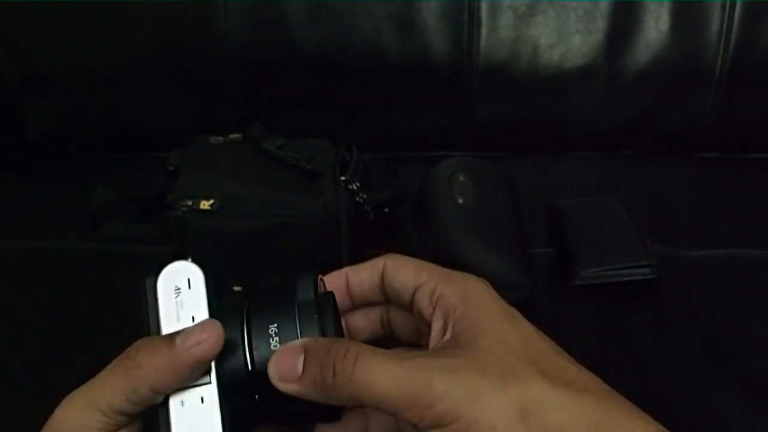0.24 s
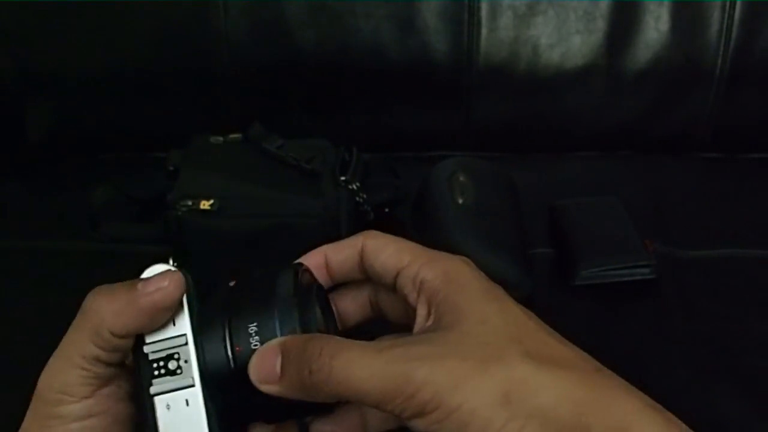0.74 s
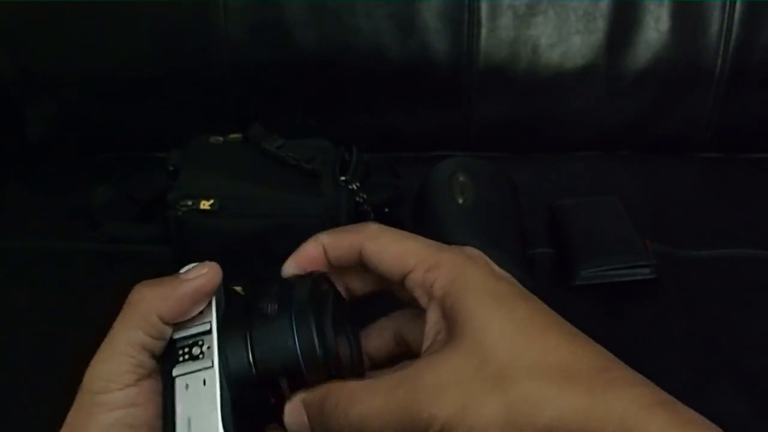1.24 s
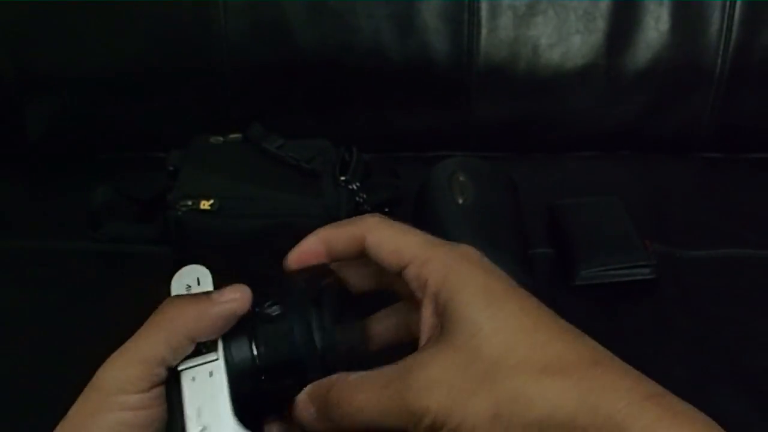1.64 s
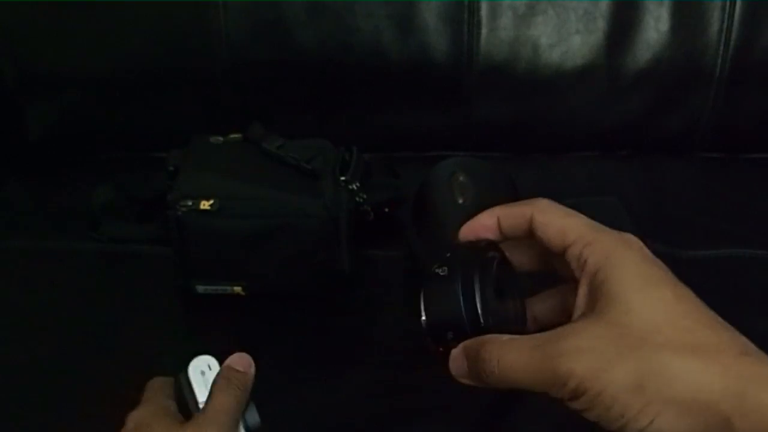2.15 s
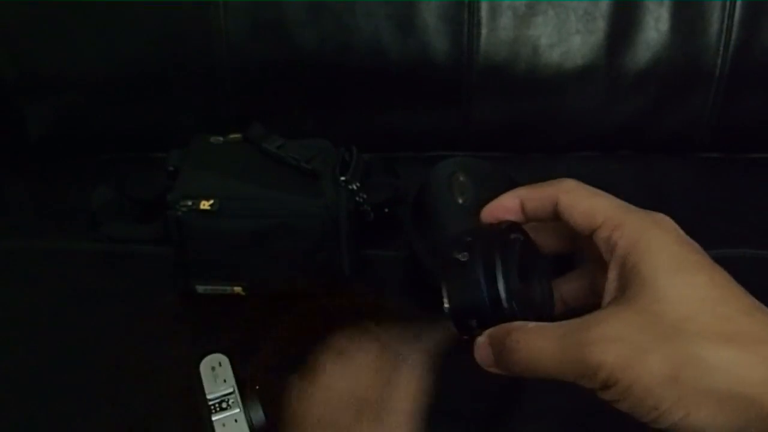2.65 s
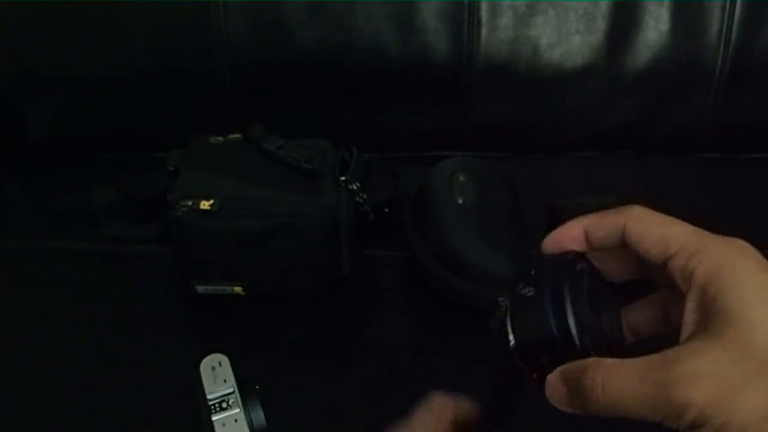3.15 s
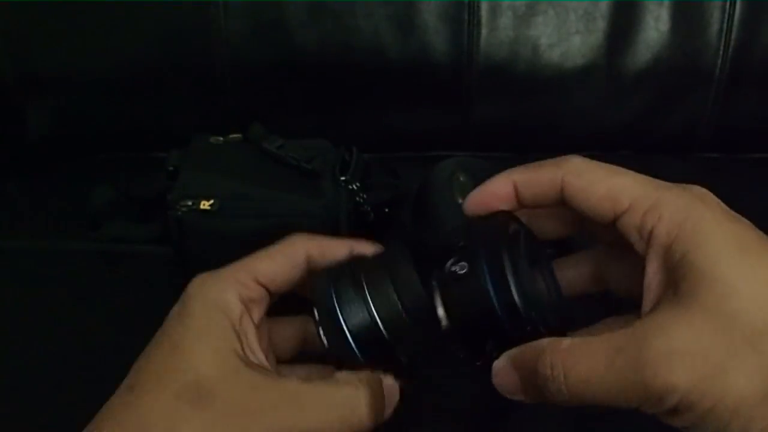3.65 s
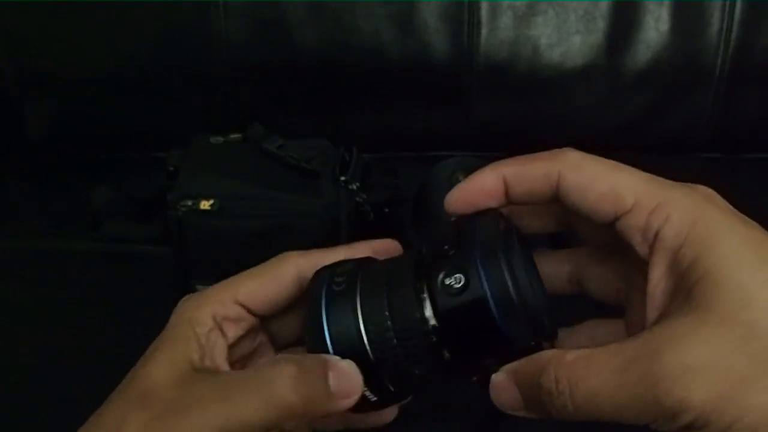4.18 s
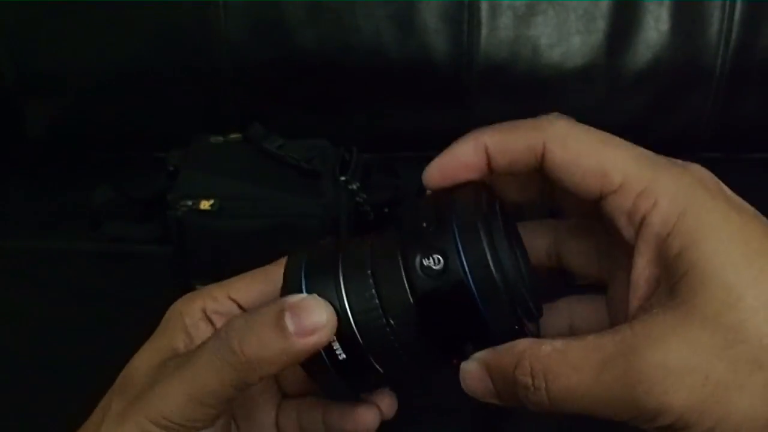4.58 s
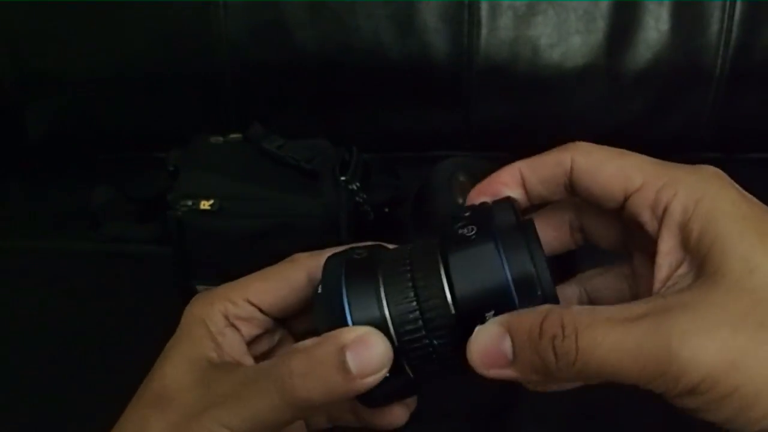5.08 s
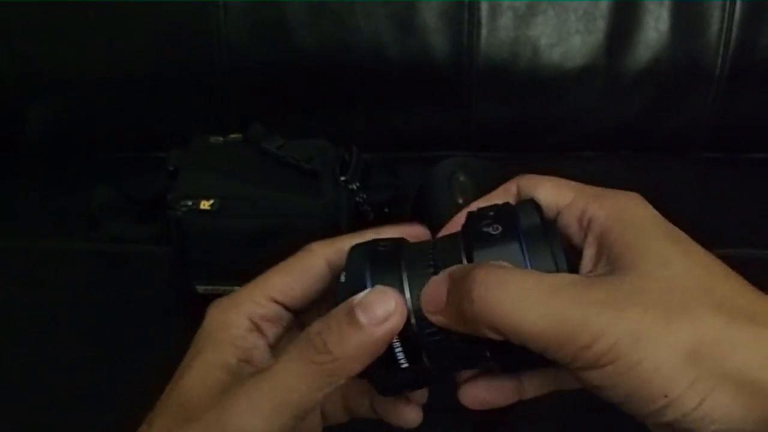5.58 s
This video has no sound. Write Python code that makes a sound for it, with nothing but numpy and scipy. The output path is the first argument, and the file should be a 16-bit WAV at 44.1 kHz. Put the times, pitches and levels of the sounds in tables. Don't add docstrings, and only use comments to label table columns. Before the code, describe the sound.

Two hands handle camera parts just right of centre, heard very near. High tiny ticks and a faint rubber squeak lead to detent clicks, then a cluster of clacks as the lens detaches. Dull padded bumps follow. Another lens knocks in brightly, the pair are twisted and coupled with crisp metal blows, the hardest ringing briefly in the room. It ends on faint finger rubs and a soft double knock over steady low hush.

```python
import sys
import numpy as np
from scipy import signal
from scipy.fft import rfft, irfft, next_fast_len
from scipy.io import wavfile
from scipy.ndimage import uniform_filter1d, map_coordinates

SR = 44100
rng = np.random.default_rng(int(sys.argv[2]) if len(sys.argv) > 2 else 0)


def store_pcm(level_fs):
    pcm = np.round(np.clip(level_fs, -1, 1) * 32767).astype(np.int16)
    wavfile.write(sys.argv[1], SR, np.atleast_2d(pcm).T)


def rack_gain(trim_db):
    fader = np.asarray(trim_db, float)
    return 10 ** (fader / 20)


N = 256662


# t/s, peak level/dB, barrel knock/dB, bright edge/dB, strongest mode f/Hz
COUPLING_BLOWS = [(3.9929, -12.5, 0.5, -12.5, 2940), (4.0031, -20, -7, -20, 2880),
                  (4.006, -25, -20, -22, 3300), (4.015, -29, -4, -8, 2000), (4.0234, -23.5, -5, -32, 1703),
                  (4.0445, -31, -1, -26, 1880), (4.087, -17, -7.5, -6.5, 2400),
                  (4.091, -32, -10, -16, 2300), (4.097, -25, 1, -22, 2400), (4.1035, -30, -10, -16, 2420),
                  (4.1095, -31, 5, -9, 1910), (4.116, -45, -4, -12, 3200), (4.1685, -16, -10, -11, 3870),
                  (4.1753, -29, 5, -20, 4350), (4.179, -33, -3, -22, 2120), (4.19, -33.5, 6, -8, 2090),
                  (4.4098, -21, -6.5, -11.5, 2030), (4.4134, -6, -4, -14.5, 4420),
                  (4.415, -10.5, -10, -9.5, 6440), (4.4172, -13.5, -1.5, -13, 4370),
                  (4.4244, -30, -4, -14, 2170), (4.4335, -43, 0, -18, 2050), (4.44, -25.5, -3, -22, 2050),
                  (4.4435, -25, -12, -22, 4550), (4.4525, -30, 4, -18, 2980),
                  (4.4573, -16, -7.5, -20, 4680), (4.4655, -18, -12, -13, 4440), (4.473, -36, 0, -20, 2050),
                  (4.478, -29, -2, -17, 4300)]


def coupling():
    return contacts(COUPLING_BLOWS, t60=0.015, low_hz=1420, sing=0.98)


# t/s, peak level/dB, barrel knock/dB, bright edge/dB, strongest mode f/Hz
CLACK_BLOWS = [(1.555, -19, -4, -15, 3380), (1.558, -18, -9, -14, 3300), (1.5625, -36, 0, -17, 2920),
               (1.5685, -38, 3, -17, 3100), (1.574, -29, 4, -22, 2100), (1.5835, -22.5, -1.5, -18, 3900),
               (1.588, -32, -5, -13, 2600), (1.5922, -22, -23, -12, 5100), (1.597, -26, -10, -25, 4570),
               (1.6005, -31, -10, -11, 3300), (1.6035, -30, -1, -21, 4370), (1.6075, -28.5, 1, -23, 2900),
               (1.6105, -40, -6, -17, 4600), (1.616, -40, -1, -19, 3000), (1.6504, -40, -10, -14, 1680),
               (1.6692, -37, -21, -21, 3940), (3.2497, -18.5, 0, -22, 2180),
               (3.2508, -11, -1.5, -8.5, 4330), (3.2535, -17, -6, -12, 3234), (3.2565, -21, 0, -24, 3130),
               (3.2625, -28, -2, -22, 3160), (3.268, -39, -8, -20, 2000), (3.288, -45, -11, -16, 3100),
               (3.2762, -25, -24, -16, 4240), (3.3322, -29, -2, -16, 1810), (3.3368, -25.5, 4, -28, 1500),
               (3.34, -29.5, -8, -20, 4200)]


def clacks():
    return contacts(CLACK_BLOWS, t60=0.012, low_hz=1383, sing=1.0)


# t/s, peak level/dB, barrel knock/dB, bright edge/dB, strongest mode f/Hz
DETENT_CLICKS = [(0.9041, -28.5, -10.5, 0.5, 3300), (0.9175, -27.5, -21, -9, 5460),
                 (1.1488, -28, -2, -24, 2950), (1.1554, -34, 2, -32, 3500), (1.1528, -33, -7, -27, 3560),
                 (1.1645, -35.5, -8, -18, 2900), (1.185, -44, 3, -30, 2050), (1.202, -32, -8.5, -11, 4540),
                 (1.2436, -35.5, -12, -19, 4200), (1.2521, -39, -13, -28, 2050),
                 (1.2565, -47, -10, -22, 3000), (1.2866, -46, -28, -28, 4050), (1.409, -42, -9, -11, 1740)]


def detents():
    return contacts(DETENT_CLICKS, t60=0.019, low_hz=2300, sing=1.26)


# t/s, peak level/dB, barrel knock/dB, bright edge/dB, strongest mode f/Hz
LATCH_CLICKS = [(0.2554, -39.5, -9, -24, 3720), (0.3065, -34.5, 11, 0.5, 2050),
                (0.3338, -35.5, -6, -10, 3750), (0.5708, -41, -15, -32, 2200),
                (0.5795, -38, -22, -19, 2100), (0.5963, -43, -14, -12, 2050), (0.621, -41, -5, -29, 2360),
                (0.633, -37, -9, -31, 2350), (0.6447, -32.5, -13, -27, 2370), (0.6608, -34, -22, -26, 3220),
                (0.6838, -35, -26, -23, 3200), (0.733, -28, -18, -36, 3370), (0.7563, -24, -18, -19, 3290),
                (0.7654, -31.5, -11, -25, 3100), (0.8039, -36, -22, -6, 3840)]


def latch():
    return contacts(LATCH_CLICKS, t60=0.014, low_hz=2200, sing=1.0)


# t/s, peak level/dB, barrel knock/dB, bright edge/dB, strongest mode f/Hz
STRAY_TICKS = [(1.8107, -40.5, -2, -15, 1630), (2.0247, -33, -1, -16, 2300), (2.0385, -32, -5, -28, 2453),
               (2.172, -41, 9, -20, 1560), (2.2131, -38, -1, -17, 1830), (2.994, -45, -20, -5, 4200),
               (3.015, -36, 1.5, -14, 3580), (4.6503, -43, -9, -17, 3500), (4.7212, -37.5, -6, -3, 2050),
               (5.1587, -38.5, -8, -18, 2130), (5.342, -40, -11, -33, 3980), (5.7393, -42, -8, -22, 1760),
               (5.7435, -42, -12, -20, 2016), (5.7552, -49, -15, -28, 4200),
               (5.7625, -39.5, -20, -14, 3370), (5.7665, -42, -12, -12, 2120), (5.7715, -47, -20, -8, 4300),
               (5.7787, -28, -5, -20, 1690), (5.7834, -30, -8, -20, 2240), (5.7907, -32, -21, -23, 1720),
               (5.802, -43, -10, -20, 4200), (5.8055, -47, -10, -18, 2050)]


def stray_ticks():
    return contacts(STRAY_TICKS, t60=0.022, low_hz=1460, sing=1.0)


# f/Hz, level/dB
BARREL_MODES = [(760, -16), (1015, 4.5), (1100, 0.5), (1210, -3), (2070, -4), (3150, -4.5), (4350, -15)]
# f/Hz, level/dB
MOUNT_STRENGTH = [(1500, -8), (2080, 0), (2600, -8), (3200, -7), (3700, -6), (4300, -1), (5600, -7)]
# f/Hz, width/Hz, level/dB
EDGE_PEAKS = [(7190, 1250, -1), (8500, 1100, 2), (9720, 1230, -2), (12520, 1570, -3.5), (13800, 1900, -5.5)]


def contacts(rows, t60, low_hz, sing):
    out, t = np.zeros((2, N + SR)), np.arange(SR // 22) / SR
    broad = signal.butter(2, [low_hz, 6500], "band", fs=SR, output="sos")
    dense_hz = np.geomspace(low_hz, 5800, num=40)
    dense = np.transpose([dense_hz, along(MOUNT_STRENGTH, dense_hz)])
    spit = rack_gain(-60 * t / (1.55 * t60)) + rack_gain(6 - 60 * t / 0.0032)
    rise = 1 - np.exp(-t / 0.00021)
    for s, db, knock_db, edge_db, hz in rows:
        knock = rack_gain(knock_db + 5.0) * ringing(BARREL_MODES, t, 1.53 * t60, detune=0.041, scatter=0.69)
        luck = rng.standard_normal(len(EDGE_PEAKS))
        facets = [(c, w, g + 2.14 * k) for (c, w, g), k in zip(EDGE_PEAKS, luck)]
        crack = filtered(spit * rng.standard_normal(len(t)), resonant(facets))
        voice = rack_gain(-3.5 - 60 * t / (sing * t60)) * np.sin(2 * np.pi * hz * t)
        snap = rack_gain(2.5 - 60 * t / 0.0044) * signal.sosfilt(broad, rng.standard_normal(len(t)))
        mount = ringing(dense, t, t60, detune=0.029, scatter=np.pi)
        rest = mount + snap + knock + rack_gain(edge_db + 5.5) * crack
        blow = rise * (rest + voice * rack_gain([[0], [-9]]))
        out[:, round(s * SR):][:, :len(t)] += rack_gain(db + 1.0) * blow / np.abs(blow[0]).max()
    return out[:, :N]


def ringing(modes, t, t60, detune, scatter):
    hz, db = np.transpose(modes)
    luck = rng.standard_normal((4, len(hz), 1))
    swing = np.sin(2 * np.pi * hz[:, None] * (1 + detune * luck[1]) * t + scatter * luck[3])
    decay = rack_gain(db[:, None] + 2.0 * luck[0] - 60 * t / t60 * rack_gain(0.5 * luck[2]))
    ring = (decay * swing).sum(0)
    return ring / np.abs(ring).max()


# t/s, level/dB, f/Hz, t60/s
LINGERING_MODES = [(0.918, -43, 5600, .07), (1.149, -50, 1094, 0.091), (1.556, -36, 1080, .25),
                   (1.585, -35, 1177, .25), (1.603, -40, 1020, 0.17), (3.251, -27.5, 1101, 0.14),
                   (3.25, -27, 1364, 0.082), (3.252, -36, 2070, .07), (3.252, -33, 3230, 0.08),
                   (3.29, -41, 1122, 0.33), (4.088, -35, 2430, 0.088), (4.169, -32, 2670, .03),
                   (4.17, -37, 3870, 0.025), (4.416, -34, 1013, 0.26), (4.43, -37, 1190, .6),
                   (4.458, -38, 1138, 0.45), (4.414, -27, 700, .04), (5.779, -41, 712, .05),
                   (1.593, -32, 5150, .04), (1.594, -32, 3390, .05), (1.6, -33, 4410, 0.056),
                   (1.605, -36, 2900, .04), (1.557, -36, 780, .04), (1.604, -38, 800, .05),
                   (4.458, -35, 2090, .12), (0.905, -42, 2400, .03), (1.154, -43, 3300, .05)]


def lingering():
    out, t = np.zeros((2, N + SR)), np.arange(SR // 2) / SR
    spread = 0.035
    for s, db, hz, t60 in LINGERING_MODES:
        luck = rng.standard_normal((3, 5, 1))
        ports = 0.25 * luck[2] * np.array([-1, 1])[:, None, None]
        phase = 2 * np.pi * hz * (1 + spread * luck[0]) * t + np.pi * luck[1] + ports
        ring = np.sin(phase).sum(1) / 2
        swell = 1 - np.exp(-t / 0.00084)
        out[:, round(s * SR):][:, :len(t)] += rack_gain(db - 60 * t / t60) * swell * ring
    return out[:, :N]


# start t/s, hardest t/s, end t/s, peak level/dB, dull part level/dB
RATTLE_STROKES = [
    (1.15, 1.158, 1.181, -45.5, 0.5),
    (3.255, 3.265, 3.296, -37.5, 1),
    (1.557, 1.566, 1.585, -36, -11),
    (1.61, 1.625, 1.7, -49.5, -8),
    (1.587, 1.597, 1.616, -32, -31),
    (4.42, 4.47, 4.49, -45.5, 1),
]


def rattle():
    gains = strokes(RATTLE_STROKES, ends_db=-13.5, bright_db=-3.0)
    return rubbing(gains, SKIN_PEAKS, SKIN_TOP_PEAKS, grainy_db=3.0, shifty_db=1.0)


# start t/s, hardest t/s, end t/s, peak level/dB, dull part level/dB
GRIND_STROKES = [
    [(3.53, 3.575, 3.61, -54, -6)],
    [(3.61, 3.65, 3.7, -48.5, 1), (3.65, 3.685, 3.715, -52, 1)],
    [(3.74, 3.78, 3.86, -61, 5), (3.8, 3.86, 3.96, -58, -1)],
    [(3.94, 3.978, 3.995, -51.5, 1), (3.998, 4.015, 4.075, -46.5, 2.5)],
]
# f/Hz, width/Hz, level/dB
RING_PEAKS = [
    [(4600, 120, 6), (5700, 170, 8), (8000, 120, 7), (8580, 140, 11), (9090, 100, 5), (9660, 150, 6),
     (12300, 200, 3), (12900, 110, -2), (13500, 120, 3), (10900, 15000, -8)],
    [(4100, 140, 0), (4670, 100, -3), (5570, 150, 11), (7880, 290, 12), (8500, 150, 1), (9550, 120, 6),
     (12400, 150, -7), (14100, 200, 4), (10900, 12000, -6)],
    [(7700, 160, 10), (8700, 110, 9), (9640, 120, 10), (12200, 110, 3), (14100, 220, 1), (10900, 11000, -8)],
    [(8300, 300, 12), (9750, 120, 0), (12600, 400, -6), (13700, 500, 4), (10900, 13000, -8)],
]


def grinding():
    out = np.zeros(N)
    for turn, rings in zip(GRIND_STROKES, RING_PEAKS):
        gains = strokes(turn, ends_db=-11, bright_db=1.5)
        out += rubbing(gains, SKIN_PEAKS, rings, grainy_db=3, shifty_db=4)
    return out


# start t/s, hardest t/s, end t/s, peak level/dB, dull part level/dB
FINGER_STROKES = [(0.22, 0.246, 0.28, -58, -17), (0.29, 0.33, 0.38, -68, -4), (0.565, 0.66, 0.73, -62, 7.5),
                  (0.76, 0.77, 0.89, -58, -12), (0.92, 0.93, 1.15, -57, -17), (1.17, 1.21, 1.24, -56.5, -6),
                  (1.39, 1.408, 1.48, -61, -10), (1.52, 1.549, 1.556, -54, -1),
                  (2.036, 2.043, 2.075, -51.5, 3), (2.17, 2.205, 2.245, -57.5, 4),
                  (2.985, 2.995, 3.03, -64, -1), (5.135, 5.163, 5.17, -57, -5),
                  (5.15, 5.2, 5.34, -60.5, -15), (5.19, 5.245, 5.32, -63, -19),
                  (5.24, 5.29, 5.6, -63.5, -22)]
# f/Hz, width/Hz, level/dB
SKIN_PEAKS = [(3300, 2200, 8), (4720, 300, 1.5), (2200, 1100, -33)]
# f/Hz, width/Hz, level/dB
SKIN_TOP_PEAKS = [(6750, 2500, 8), (15000, 1700, -17)]


def fingers():
    gains = strokes(FINGER_STROKES, ends_db=-14.0, bright_db=-0.5)
    return rubbing(gains, SKIN_PEAKS, SKIN_TOP_PEAKS, grainy_db=2.0, shifty_db=3)


# start t/s, hardest t/s, end t/s, peak level/dB, dull part level/dB
PALM_STROKES = [
    (1.52, 1.545, 1.79, -59.5, 6.5),
    (2.07, 2.1, 2.26, -60.5, 1.5),
    (2.17, 2.22, 2.12, -60, 7),
    (2.93, 3.04, 3.213, -69, 13.5),
    (5.73, 5.79, 5.86, -54, -1),
]


def palm():
    gains = strokes(PALM_STROKES, ends_db=-6.5, bright_db=-10.0)
    return rubbing(gains, SKIN_PEAKS, SKIN_TOP_PEAKS, grainy_db=1.0, shifty_db=3)


# start t/s, hardest t/s, end t/s, peak level/dB, dull part level/dB
DRAG_STROKES = [
    (0.33, 0.45, 0.54, -64.5, 6),
    (4.85, 4.95, 5.6, -68.5, -10),
]
# f/Hz, width/Hz, level/dB
RUBBER_PEAKS = [(3500, 1200, -11), (4200, 1800, -6)]


def rubber_drag():
    gains = strokes(DRAG_STROKES, ends_db=-1, bright_db=-38)
    return rubbing(gains, RUBBER_PEAKS, SKIN_TOP_PEAKS, grainy_db=4.5, shifty_db=2.5)


# t/s, f/Hz, level/dB
SQUEAL_GLIDE = [(0.34, 3760, -70), (0.385, 3660, -61), (0.405, 3550, -69), (0.44, 3500, -55),
                (0.48, 3380, -63), (0.51, 3350, -70), (0.535, 3420, -65), (0.555, 3400, -73)]


def squeal():
    s, hz, db = np.transpose(SQUEAL_GLIDE)
    t = np.arange(N) / SR
    width_hz = 210
    phase = 2 * np.pi * np.cumsum(np.interp(t, s, hz)) / SR
    fuzz = unit(wobble(width_hz) * np.cos(phase) + wobble(width_hz) * np.sin(phase))
    return rack_gain(np.interp(t, s, db, left=-120, right=-120)) * fuzz


def strokes(rows, ends_db, bright_db):
    gains, t = np.zeros((3, N)), np.arange(N) / SR
    for start, hardest, end, db, dull_db in rows:
        fade = np.clip(np.minimum(t - start, end - t) / 0.0022, 0, 1)
        press_db = np.interp(t, [start, hardest, end], [db + ends_db, db, db + ends_db])
        gains += fade * rack_gain(press_db) * rack_gain([[0], [dull_db], [bright_db]])
    return gains


def rubbing(gains, surface, top, grainy_db, shifty_db):
    slip = rack_gain(grainy_db * wobble(250) + 0.48 * wobble(40)) * rng.standard_normal((3, N))
    hollow = [(1110, 470, 16.0), (2050, 1800, 5.2)]
    bright = np.zeros(N)
    for k, peak in enumerate(top):
        bright += (-1) ** k * rack_gain(shifty_db * wobble(14)) * filtered(slip[2], resonant([peak]))
    middle = unit(filtered(slip[0], resonant(surface)))
    dull = unit(filtered(slip[1], resonant(hollow)))
    return (gains * [middle, dull, unit(bright)]).sum(0)


# t/s, peak level/dB, f/Hz
SOFT_KNOCKS = [(0.332, -38.5, 435), (0.635, -49, 191), (1.552, -47, 427), (1.665, -38.5, 350),
               (1.781, -31.5, 362), (1.794, -38.5, 464), (1.829, -43, 308.6), (1.86, -41.5, 427),
               (1.949, -44.5, 400), (2.022, -36.5, 400), (2.092, -44, 324), (2.169, -37, 352),
               (2.775, -50, 330), (2.839, -41, 348), (3.249, -31.5, 395), (3.989, -30, 597),
               (4.085, -30, 585), (4.164, -29.5, 615), (4.409, -56, 586), (4.464, -36.5, 334),
               (5.161, -41.5, 554), (5.775, -34, 710), (5.787, -38.5, 596)]


def soft_knocks():
    return thuds(SOFT_KNOCKS, cycles=7.9)


# t/s, peak level/dB, f/Hz
SEAT_BUMPS = [
    (0.631, -51, 203),
    (1.659, -44, 252),
    (1.781, -39, 206.1),
    (2.029, -48, 111),
    (2.099, -43.5, 187),
    (2.298, -61, 78.1),
    (2.832, -50, 146),
    (3.254, -57, 196),
    (3.989, -58, 259),
    (4.42, -70, 112.6),
]


def seat_bumps():
    return thuds(SEAT_BUMPS, cycles=7.8)


def thuds(rows, cycles):
    out, t = np.zeros(N + SR), np.arange(SR // 5) / SR
    for s, db, hz in rows:
        decay = rack_gain(db + 5.0 - 60 * t * hz / cycles)
        soft_start = 1 - np.exp(-t * hz / .5)
        out[round((s + .003) * SR):][:len(t)] += decay * soft_start * np.sin(2 * np.pi * hz * t)
    return out[:N]


# f/Hz, likeness/1
TAIL_LIKENESS = [(300, 0.94), (700, 0.97), (1500, 0.35), (4000, 0.019)]
# f/Hz, t60/s
ROOM_DECAY = [(200, 0.22), (800, 0.57), (1150, 0.74), (1600, 0.56), (2100, 0.61), (4000, 0.53),
              (8000, 0.45), (15000, 0.46)]
# f/Hz, level/dB
TAIL_COLOUR = [(200, 8), (950, -9), (1140, -1), (1350, -4), (2100, -2.5), (4000, -3), (8000, -2),
               (15000, -2)]


def room(x):
    out, hop = np.zeros((2, N + SR)), SR // 4

    def upper(v):
        return filtered(v, lambda hz: np.clip(hz / 400 - 1, 0, 1))

    blurred = upper(upper(x) * (.45 + .9 * unit(wobble(900))))
    sides = x - upper(x) + blurred
    for start in range(0, N, hop):
        hz, t, z = signal.stft(rng.standard_normal((2, SR // 2)), SR, nperseg=512)
        alike = np.clip(along(TAIL_LIKENESS, hz), 0, 1)[:, None]
        z[1] = alike * z[0] + np.sqrt(1 - alike ** 2) * z[1]
        decay_db = along(TAIL_COLOUR, hz)[:, None] - 60 * t / along(ROOM_DECAY, hz)[:, None]
        tail = signal.istft(z * rack_gain(decay_db), SR, nperseg=512)[1]
        piece = unit(sides[None, start:start + hop]) * np.std(x[start:start + hop])
        wet = signal.fftconvolve(piece, tail / np.linalg.norm(tail[0]), axes=1)
        out[:, start + 200:][:, :wet.shape[1]] += wet
    return out[:, :N]


# f/Hz, level per Hz/dB
HUSH_COLOUR = [(20, -25), (60, -7.5), (120, -6), (260, -1.5), (420, -1.5), (680, -8.5), (1150, -1),
               (1580, -6.5), (2050, -5.5), (2500, -12), (3400, -11), (5000, -16.5), (8000, -21.5),
               (13000, -28.5)]
# f/Hz, likeness/1
HUSH_LIKENESS = [(30, 0.62), (150, 0.58), (400, 0.73), (1200, 0.14), (3000, 0.032), (8000, 0.047)]


def hush():
    def colour(hz):
        turn = np.arccos(np.clip(along(HUSH_LIKENESS, hz), -1, 1)) / 2
        return rack_gain(along(HUSH_COLOUR, hz)) * [np.cos(turn), np.sin(turn)]

    mid, side = filtered(rng.standard_normal((2, N)), colour)
    drift_db = .3 * wobble(1.5) + .5 * wobble(5)
    return rack_gain(-53.5 + drift_db) * unit(np.array([mid + side, mid - side]))


# f/Hz, level/dB
FAN_TONES = [(414, -64.5), (525, -71), (125, -76.5), (1200, -84)]


def fan():
    out, t = np.zeros(N), np.arange(N) / SR
    for hz, db in FAN_TONES:
        out += rack_gain(db + 2.5 * wobble(9)) * np.sin(2 * np.pi * hz * t + 1.5 * wobble(12))
    return out


def unit(x):
    return x / np.sqrt(np.mean(x ** 2) + 1e-20)


def along(points, hz):
    f, v = np.transpose(points)
    return np.interp(np.log(hz + 1), np.log(f + 1), v)


def filtered(x, response):
    m = next_fast_len(x.shape[-1] + 8192)
    return irfft(rfft(x, m) * response(np.fft.rfftfreq(m, 1 / SR)), m)[..., :x.shape[-1]]


def resonant(peaks):
    def response(hz):
        total = 0
        for k, (centre, width, db) in enumerate(peaks):
            damping = 1j * hz * width
            total = total + (-1) ** k * rack_gain(db) * damping / (centre * centre - hz * hz + damping)
        return total
    return response


def wobble(rate):
    knots = rng.standard_normal(int(N * rate / SR) + 4)
    return map_coordinates(knots, [np.arange(N) * rate / SR])


# f/Hz, phase/rad
RIGHT_LEAD = [(500, 0), (2700, .6), (5000, 1.1), (9000, 1.1), (13000, 1)]


def scene():
    hands = coupling() + clacks() + detents() + latch() + stray_ticks()
    hands += rattle() + grinding() + fingers() + palm() + rubber_drag() + squeal() + soft_knocks()
    side = np.array([[-1], [1]])

    def lean_db(hz):
        return along([(120, -18), (300, 0)], hz) + side * along([(1000, 0), (2500, 1.0), (8000, 2.0)], hz)

    direct = filtered(hands[0], lambda hz: rack_gain(lean_db(hz)) * np.exp(.5j * side * along(RIGHT_LEAD, hz)))
    to_walls = filtered(hands[1], lambda hz: rack_gain(lean_db(hz).mean(0)))
    return direct + lingering() + seat_bumps() + rack_gain(-6.5) * room(to_walls) + hush() + fan()


# f/Hz, level per line/dB
MUTE_FLOOR = [(4000, -120), (6000, -108), (9000, -105), (11000, -102), (13000, -104), (14400, -102),
              (15200, -99), (15400, -92), (16600, -92)]


def muted(x, mask_db):
    hz, _, z = signal.stft(x, SR, window="cosine", nperseg=2048)
    power = np.abs(z[:, 1:]) ** 2
    bands = power.reshape(2, -1, 16, z.shape[-1]).mean(axis=(0, 2))
    floor = rack_gain(2 * along(MUTE_FLOOR, hz[1:, None])) + rack_gain(2 * mask_db) * bands[18:44].mean(0)
    flicker = unit(uniform_filter1d(rng.standard_normal(bands.shape), size=3, axis=1))
    floor = floor * np.repeat(rack_gain(2 * 3.2 * flicker), 16, axis=0)
    keep = np.repeat(bands, 16, axis=0) > floor
    keep = keep & (power > floor)
    keep = np.pad(keep, ((0, 0), (1, 0), (0, 0)), constant_values=True)
    return signal.istft(z * keep, SR, window="cosine", nperseg=2048)[1][:, :N]


# f/Hz, width/Hz, depth/dB
PORT_NOTCHES = [(1533, 86, -4), (5710, 1730, -5), (5980, 230, -13), (10984, 1340, -18), (11210, 640, -5),
                (17200, 2400, -28)]


def microphone(x):
    def ports(hz):
        return rack_gain(sum(db * np.exp(-((hz - c) / w * 2) ** 2) for c, w, db in PORT_NOTCHES))
    return filtered(x, ports)


def band_limit(x):
    return signal.sosfilt(signal.butter(12, 16660, fs=SR, output="sos"), x)


def record(dry):
    mix = muted(microphone(dry), mask_db=-46) - .0006
    return band_limit(mix)


dry = scene()
out = record(dry)
store_pcm(out)
```